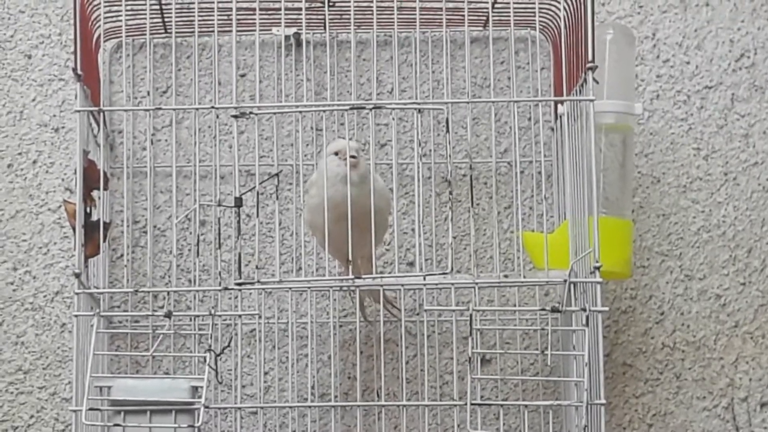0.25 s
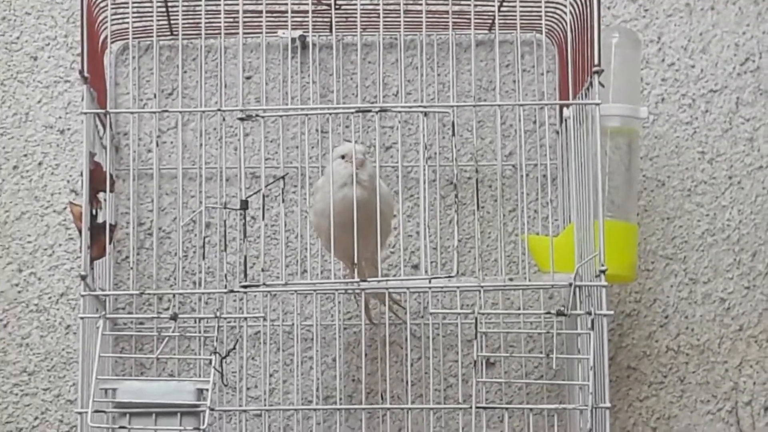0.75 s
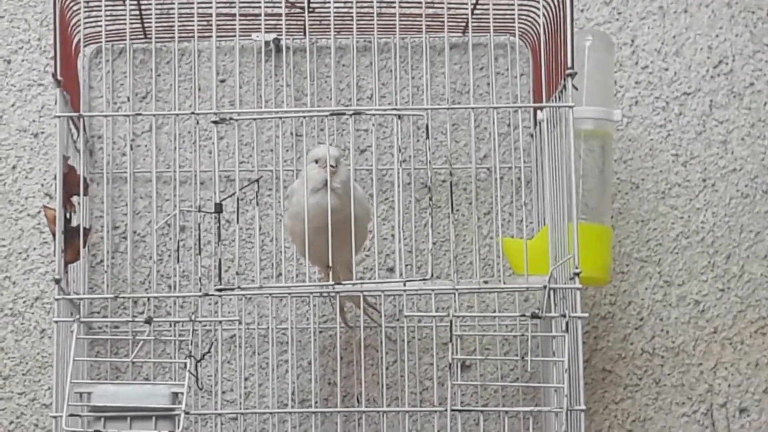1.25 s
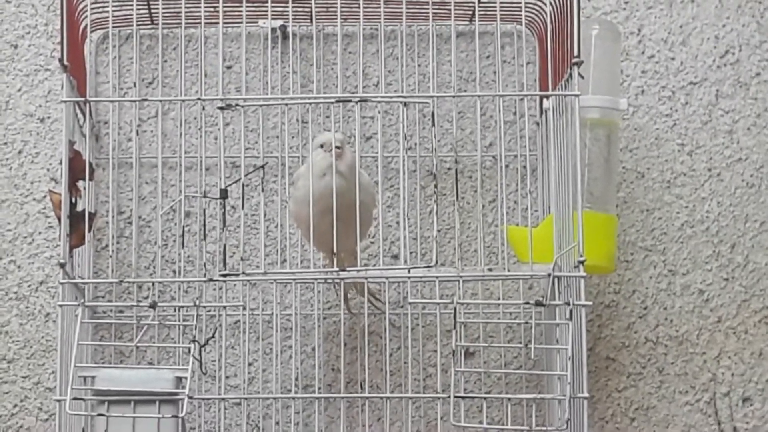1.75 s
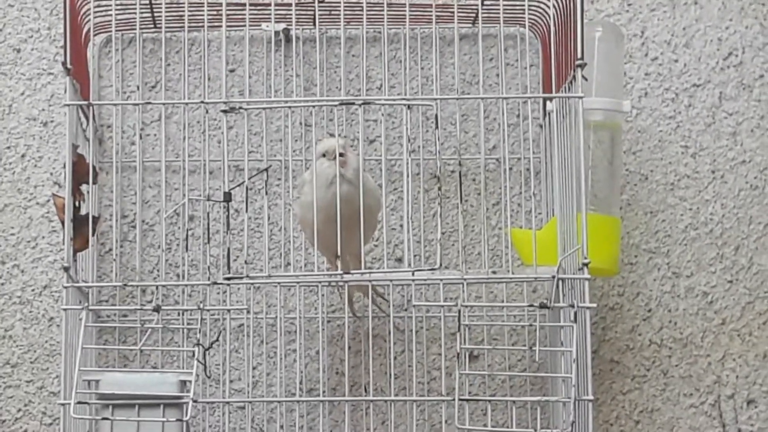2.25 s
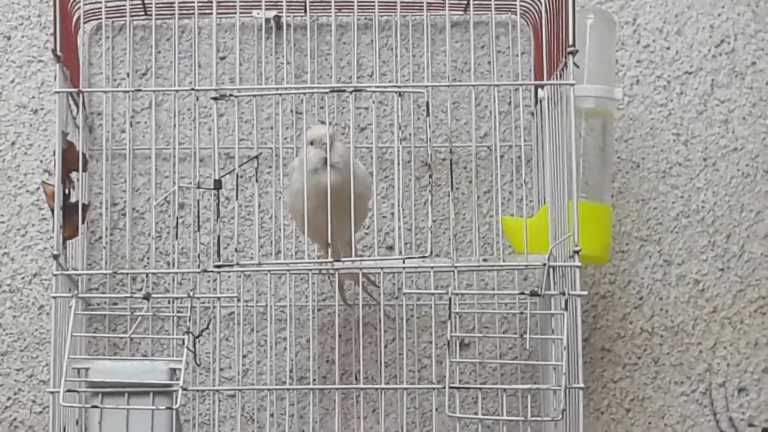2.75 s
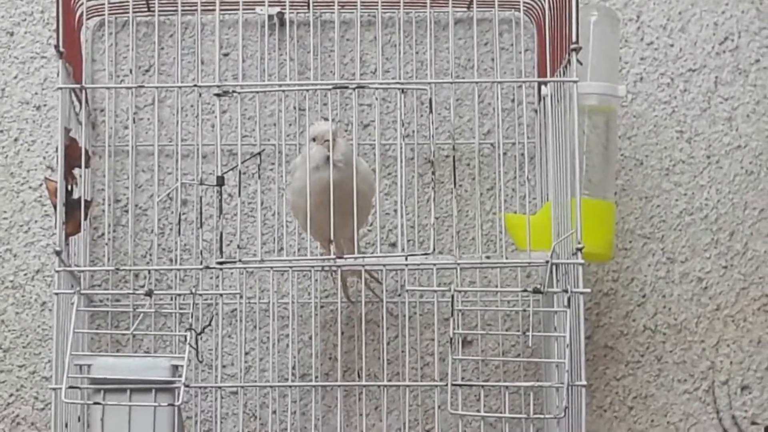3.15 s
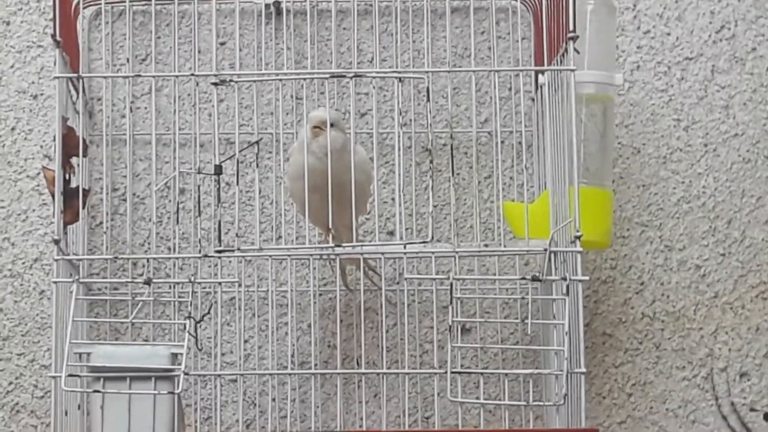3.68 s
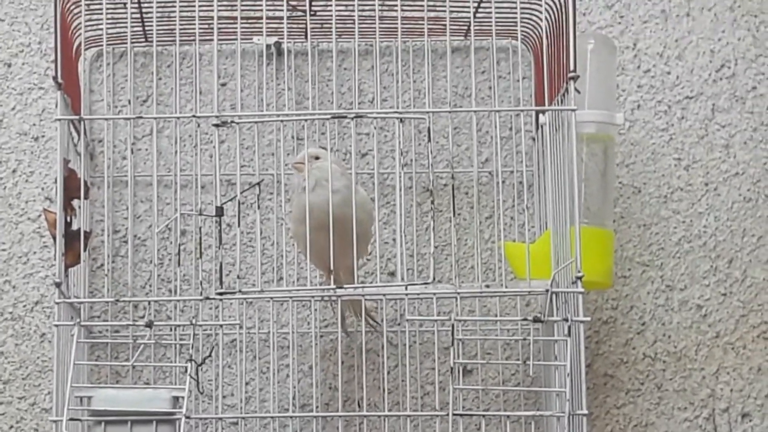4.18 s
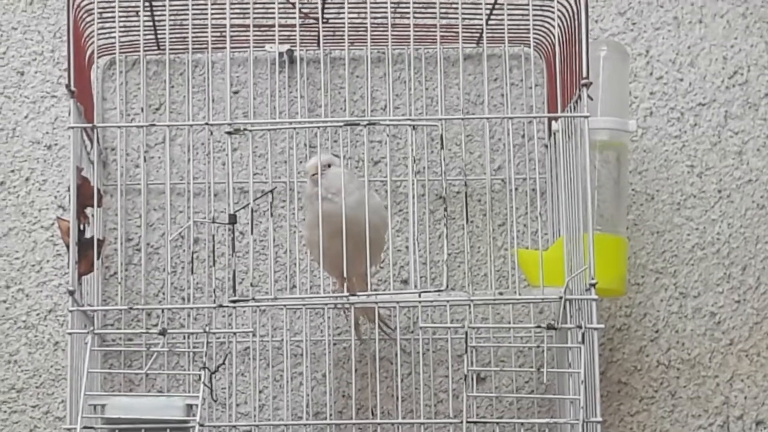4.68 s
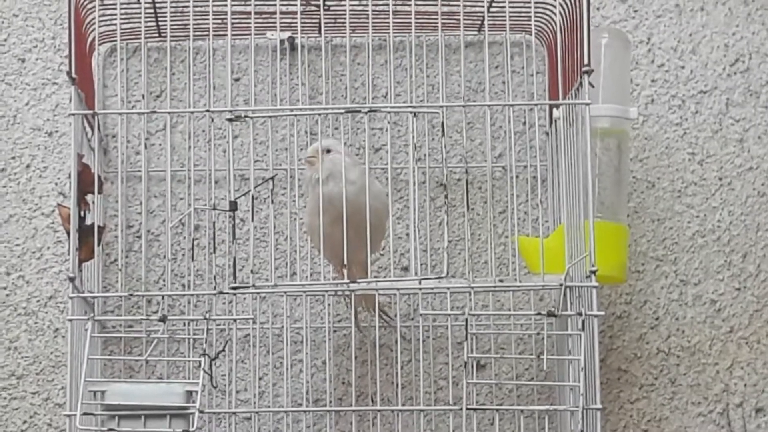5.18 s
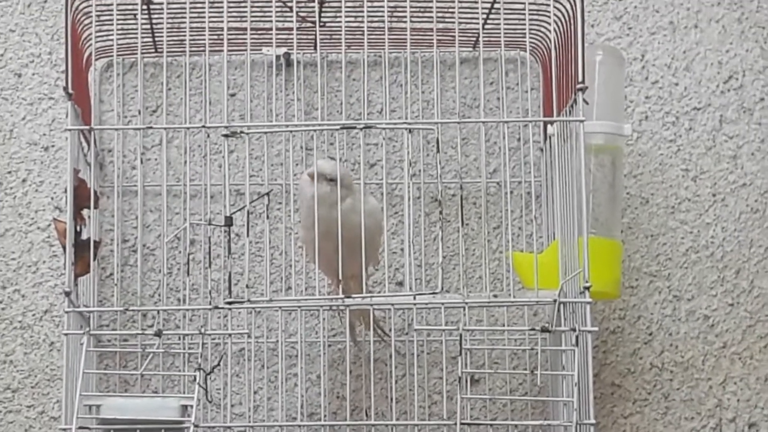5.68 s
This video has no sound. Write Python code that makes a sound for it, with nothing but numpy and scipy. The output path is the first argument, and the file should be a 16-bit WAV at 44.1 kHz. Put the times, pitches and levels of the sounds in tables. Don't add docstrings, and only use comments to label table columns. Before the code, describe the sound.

A single canary sings close to a camera microphone in a hard, echoing space. Rapid sharp chips open, then four steady whistles with tiny high lead-ins, a light falling trill and two rising whistles. More chips lead to a louder swooping trill and wandering whistles. Faint distant birds chatter in bursts over a soft, low outdoor hum.

```python
import sys
import numpy as np
from scipy import signal
from scipy.fft import rfft, irfft
from scipy.io import wavfile
from scipy.ndimage import uniform_filter1d, map_coordinates

SR = 44100
rng = np.random.default_rng(int(sys.argv[2]) if len(sys.argv) > 2 else 0)


def wrap_up_sound(samples):
    columns = np.atleast_2d(samples).T
    tamed = np.clip(columns, -1, 1)
    steps = np.round(tamed * 32767).astype(np.int16)
    wavfile.write(sys.argv[1], SR, steps)


def gain_from_db(level_db):
    decades = np.asarray(level_db, float) / 20
    return 10 ** decades


N = 261513
AHEAD = SR // 10

# frequency in Hz, density in dB per Hz.
HUM_SPECTRUM = [(15, -29.5), (25, -15.5), (48, -6.5), (126, 1.5), (222, 1), (425, -2.5), (1090, -2),
                (1680, -5), (3050, -6), (4820, -15.5), (5820, -21), (7220, -25.5), (9980, -49),
                (13800, -26), (15800, -55)]
# frequency in Hz, level in dB.
MAINS_LINES = [(48.4, -78)]

# peak time in seconds, peak level in dB.
EARLIER_CHIPS = [(-.058, -12), (-.02, -16)]
# peak time in seconds, peak level in dB.
CHIPS_SUNG = [(0.0179, -17.5), (0.0582, -28.5), (0.1014, -16), (0.1404, -16.5), (0.1759, -14.5),
              (0.2153, -15), (0.2468, -32), (2.8546, -23), (2.8901, -22.5), (2.9288, -25), (2.9643, -23.5),
              (2.9973, -19.5), (3.0439, -18.5), (3.0823, -19.5), (3.1195, -18), (3.16, -17),
              (3.1962, -18.5), (3.2244, -33.5)]
# seconds from its peak, pitch as a ratio, level in dB.
CHIP_SHAPE = [(-.0036, 1.34, -18), (-.0019, 1.12, -7), (0, .98, 0), (.0009, .89, -5), (.0018, .76, -11),
              (.003, .63, -17)]

# delay in seconds, level in dB.
WALL_ECHOES = [(.0048, -6), (.0069, -15), (.009, -15.5), (.0145, -25.5)]
# frequency in Hz, time to fall 60 dB in seconds.
ROOM_DECAY = [(2000, 0.42), (4000, 0.3), (8000, 0.37), (15000, 0.15)]
# multiple of the pitch, level in dB.
VOICE_OVERTONES = [(2, -35.5), (3, -36.5), (4, -41), (5, -53)]
# frequency in Hz, gain in dB.
BEAK_COLOUR = [(5000, -9.5), (6400, -7), (7300, 8), (8600, -4), (9800, -10.5), (11500, -8), (13000, 1.5),
               (15000, 16), (16000, -5.5)]

# start in seconds, length in seconds, first pitch in Hz, last pitch in Hz, level in dB.
SECOND_VOICE = [(.056, .01, 5270, 3700, -35), (2.62, 0.087, 2500, 2390, -54.5),
                (2.68, .06, 4330, 4290, -39.5), (4.29, 0.17, 6980, 7050, -47),
                (4.27, .235, 2900, 3180, -35.5), (4.55, 0.65, 2600, 2760, -57),
                (4.6, 0.024, 4300, 4150, -26.5), (2.498, .005, 6400, 4500, -38.5),
                (4.3, .06, 7900, 8700, -55.5)]
LINK_SLURS = [
    (2.645, 0.076, 5015, 5014, -25.5),
    (4.29, .09, 3900, 4126, -22.5),
]
HOARSE_SCRAPS = [(2.82, 0.027, 2690, 2580, -43.5), (4.22, 0.055, 5210, 6780, -40.5),
                 (4.225, .06, 2596, 3576, -36), (4.24, .045, 5580, 6300, -39.5),
                 (4.29, .08, 4980, 5180, -43.5), (4.675, 0.027, 6830, 6740, -42)]
HIGH_NOTES = [
    (5.11, .012, 5220, 6030, -29.5),
    (5.119, .04, 6030, 6253, -26),
    (5.155, 0.021, 6650, 6710, -30),
]
# share of length, share of pitch move, level in dB.
SLUR_SHAPE = [(0, 0.014, -10.5), (.15, .15, -3.5), (.8, .8, 0.5), (1, 1, -9.5)]

# start in seconds, pitch in Hz, level in dB.
LEAD_INS = [(0.304, 6890, -26), (.548, 6860, -18.5), (.822, 6900, -21), (1.105, 6930, -18.5)]
# share of length, pitch as a ratio, level in dB.
LEAD_SHAPE = [(0, 1, -8), (.15, 1, -1), (.55, .985, -2), (.78, .88, -7), (.92, .72, -5), (1, .58, -4)]

# start in seconds, length in seconds, level in dB.
HELD_WHISTLES = [(0.349, .178, -18.5), (0.591, .2, -16), (0.869, .165, -14.5), (1.151, .19, -14)]
HELD_PITCHES = [3400, 3402, 3390, 3366]
# share of length, level in dB.
HELD_SWELL = [(0, -10.5), (.1, -4.5), (.5, 0), (.8, -5.5), (1, -10)]

# start in seconds, hold in seconds, high part in dB, low part in dB.
FLOCK_BURSTS = [(0.443, 0.056, -53.5, -52), (0.582, 0.076, -53.5, -49), (0.727, .06, -52, -50.5),
                (0.839, .07, -53, -47.5), (0.928, 0.1, -52, -50), (1.107, 0.15, -52, -52),
                (1.336, 0.056, -51.5, -53), (1.44, 0.11, -49.5, -52), (1.613, 0.085, -47, -48.5),
                (1.791, 0.09, -47.5, -51), (1.969, 0.088, -49.5, -52), (2.122, 0.12, -53, -50.5),
                (2.245, 0.072, -54, -54.5), (4.207, .05, -69, -56), (4.258, .08, -58.5, -67),
                (4.38, .05, -62.5, -70.5), (4.541, .17, -66.5, -54.5), (4.761, 0.21, -63.5, -55),
                (5.063, 0.055, -57, -52), (5.213, .05, -59, -51), (5.322, 0.048, -56, -55.5),
                (5.435, 0.064, -55, -52.5), (5.543, 0.064, -55, -51.5), (5.676, 0.068, -54, -51.5),
                (5.793, 0.06, -55, -50.5)]
# frequency in Hz, density in dB per Hz.
FLOCK_HIGH_SPECTRUM = [(2060, -33), (3500, 2), (4230, -6), (4710, -2), (7000, -2), (7410, -5), (9240, -30),
                       (12600, -37), (14500, -25), (15800, -41)]
FLOCK_LOW_SPECTRUM = [(880, -49), (1500, -10.5), (2480, -1), (2870, 2), (3260, -6), (3580, -13),
                      (4200, -3.5), (5460, -41.5), (9240, -120)]

# time in seconds, depth in dB.
LEVEL_DIPS = [(.676, -28), (0.705, -14), (1.003, -15), (1.303, -16.5), (1.979, -7), (2.495, -7),
              (3.752, -8.5), (3.853, -10.5), (3.951, -10), (4.379, -11.5), (4.532, -14), (4.562, 0),
              (4.79, -9.5), (4.839, -13), (4.959, -20), (4.994, -4)]

# flick time in seconds, glide length in seconds, bend pitch in Hz, glide level in dB, flick level in dB.
SLIDE_TRILL = [(1.4653, 0.029, 5850, -33, -18), (1.545, 0.025, 5800, -35, -19),
               (1.626, .03, 5600, -30, -15), (1.7052, .032, 5690, -31, -15.5),
               (1.788, 0.027, 5650, -33, -14.5), (1.868, 0.04, 5700, -31.5, -16)]
SWOOP_TRILL = [(3.3408, .036, 3980, -18.5, -13.5), (3.4473, .038, 3870, -17.5, -12.5),
               (3.555, .043, 3890, -17.5, -15), (3.6566, .038, 4040, -19.5, -12),
               (3.7627, .04, 3800, -19, -12.5), (3.8625, .041, 3920, -19, -10.5),
               (3.962, .04, 3980, -18, -11), (4.058, 0.031, 4034, -19, -10.5), (4.16, .036, 4030, -18, -11),
               (4.287, .04, 3965, -19, -13.5)]
# share of length, share of fall, level in dB.
GLIDE_SHAPE = [(0, 0.029, -17), (.3, .31, -11), (.6, .7, -1), (.8, .9, -0.5), (1, 1, -5)]
# seconds from its peak, pitch as a ratio, level in dB.
FLICK_SHAPE = [(-.006, 1, -8), (-.0018, .92, -7), (0, .85, 0), (.0012, .78, -7), (.0036, .66, -16)]

# time in seconds, pitch in Hz, level in dB.
WINDING_WHISTLES = [
    [(1.94, 3970, -22.5), (1.951, 4123, -12.5), (1.995, 4635, -22), (2.045, 5040, -25.5), (2.08, 5056, -17),
     (2.125, 4987, -36)],
    [(4.392, 3600, -17), (4.405, 4000, -23), (4.428, 4197, -18.5), (4.456, 4750, -24.5),
     (4.49, 4605, -25.5), (4.538, 4355, -24), (4.625, 4293, -27.5)],
    [(4.725, 4260, -24.5), (4.745, 4396, -32), (4.77, 4354, -16.5), (4.835, 4265, -25), (4.885, 4348, -22),
     (4.96, 4390, -25.5), (5, 4390, -36)],
]
# start in seconds, length in seconds, first pitch in Hz, last pitch in Hz, level in dB.
RISING_WHISTLES = [
    (2.179, .19, 3475, 4870, -13),
    (2.45, .205, 3505, 4894, -14),
]


def along(points, hz):
    f, v = np.transpose(points)
    return np.interp(np.log(hz + 1), np.log(f + 1), v)


def wobble(rate, n):
    knots = rng.standard_normal(int(n * rate / SR) + 4)
    return map_coordinates(knots, [np.arange(n) * rate / SR])


def hiss(spectrum, patchy_db, lo_hz, hi_hz):
    hz, _, z = signal.stft(rng.standard_normal(N + 2048), SR, nperseg=2048)
    field = uniform_filter1d(rng.standard_normal(z.shape), size=24, axis=0)
    field = uniform_filter1d(field, size=2, axis=1)
    z = z * gain_from_db(patchy_db * field / field.std() + along(spectrum, hz)[:, None])
    in_band = (hz > lo_hz) & (hz < hi_hz)
    band = signal.istft(z * in_band[:, None], nperseg=2048)[1]
    return signal.istft(z, nperseg=2048)[1][:N] / band.std()


def whistle(song, rows, scoop, waver, bright_db, count=4):
    s, hz, db = np.transpose(rows)
    t = np.arange(s[0], s[-1], 1 / SR)
    age = t - s[0]
    pitch = np.interp(t, s, hz) * (1 - scoop * np.exp(-age / 0.0064) + waver * wobble(60, len(t)))
    phase = 2 * np.pi * (np.cumsum(pitch) / SR + rng.random())
    tone = np.sin(phase)
    for k, over_db in VOICE_OVERTONES[:count]:
        heard = k * pitch < 17000
        gain = gain_from_db(over_db + bright_db + along(BEAK_COLOUR, k * pitch))
        tone += heard * gain * np.sin(k * phase)
    fade = np.clip(np.minimum(age, t[-1] - t) / .0008, 0, 1)
    start = AHEAD + round(s[0] * SR)
    song[start:start + len(t)] += gain_from_db(np.interp(t, s, db)) * fade * tone


def outdoor_hum():
    hum = gain_from_db(-49) * hiss(HUM_SPECTRUM, patchy_db=-0.14, lo_hz=25, hi_hz=1980)
    for hz, db in MAINS_LINES:
        hum += gain_from_db(db + 2) * np.sin(2 * np.pi * hz * np.arange(N) / SR)
    return hum


def chips(song):
    for s, db in EARLIER_CHIPS + CHIPS_SUNG:
        hz = 3225 + 50 * (db + 18.0)
        rows = np.multiply(CHIP_SHAPE, [1, hz, 1]) + [s, 0, db]
        whistle(song, rows, scoop=0, waver=.02, bright_db=-1.5)


def room(x, wet_db, onset, turn, count):
    hz, t, z = signal.stft(rng.standard_normal((count, SR)), SR, nperseg=256)
    decay = gain_from_db(-60 * t / along(ROOM_DECAY, hz)[:, None])
    tails = signal.istft(z * decay, SR, nperseg=256)[1][:, :SR]
    tails *= 1 - np.exp(-np.arange(SR) / SR / onset)
    tails *= gain_from_db(wet_db) / np.linalg.norm(tails[0])
    for delay, db in WALL_ECHOES:
        spots = np.round(SR * (delay + .0002 * rng.standard_normal(count))).astype(int)
        tails[np.arange(count), spots] += gain_from_db(db + 2.9 * rng.standard_normal(count))
    turns = np.arange(len(x)) / SR / turn
    facing = np.cos(np.pi * (turns - np.arange(count)[:, None]) / count) ** 2
    sent = x * facing / np.linalg.norm(facing, axis=0)
    return x + signal.fftconvolve(sent, tails, axes=1)[:, :len(x)].sum(0)


def slurs(song):
    kinds = ((SECOND_VOICE, .009, 3), (LINK_SLURS, .003, -.6), (HOARSE_SCRAPS, .015, 3), (HIGH_NOTES, .009, 8))
    for notes, waver, bright_db in kinds:
        for s, length, first_hz, last_hz, db in notes:
            rows = np.multiply(SLUR_SHAPE, [length, last_hz - first_hz, 1]) + [s, first_hz, db]
            whistle(song, rows, .01, waver, bright_db)


def lead_ins(song):
    for s, hz, db in LEAD_INS:
        rows = np.multiply(LEAD_SHAPE, [.032, hz, 1]) + [s, 0, db]
        rows[:, 2] += -9.5 * (rows[:, 1] > .9 * hz)
        whistle(song, rows, scoop=0, waver=.003, bright_db=11, count=1)


def held_whistles(song):
    for (s, length, db), hz in zip(HELD_WHISTLES, HELD_PITCHES):
        rows = np.multiply(HELD_SWELL, [length, 1]) + [s, db]
        whistle(song, np.insert(rows, 1, hz, axis=1), scoop=.13, waver=0.0022, bright_db=-3.5)


def flock():
    rise_s, fade_s = 0.015, 0.059
    s, hold, high_db, low_db = np.transpose(FLOCK_BURSTS)[..., None]
    age = np.arange(N) / SR - s
    shape = np.clip(age / rise_s, 0, 1) * np.exp(-np.clip(age - hold, 0, None) / fade_s)
    high = (gain_from_db(high_db) * shape).max(0) * hiss(FLOCK_HIGH_SPECTRUM, patchy_db=2.5, lo_hz=7300, hi_hz=8300)
    low = (gain_from_db(low_db) * shape).max(0) * hiss(FLOCK_LOW_SPECTRUM, patchy_db=1.8, lo_hz=1900, hi_hz=2500)
    return (high + low) * gain_from_db(0.3 * wobble(120, N))


def level_dips():
    t = np.arange(N) / SR
    drops = [(s, .004, db) for s, db in LEVEL_DIPS]
    drops += [(s + length + 0.055, 0.046, -5) for s, length, _ in HELD_WHISTLES]
    return gain_from_db(sum(db * np.exp(-((t - s) / half) ** 2) for s, half, db in drops))


def trills(song):
    for trill, fall_hz, swell, bright_db in ((SLIDE_TRILL, 1400, 1, 8), (SWOOP_TRILL, 1220, 1.08, 0.99)):
        for s, length, bend_hz, glide_db, flick_db in trill:
            start = s + FLICK_SHAPE[0][0] + 0.0012 - length
            glide = np.multiply(GLIDE_SHAPE, [length, -fall_hz, swell]) + [start, bend_hz + fall_hz, glide_db]
            whistle(song, glide, 0, .006, bright_db)
            flick = np.multiply(FLICK_SHAPE, [1, bend_hz, 1]) + [s, 0, flick_db]
            whistle(song, flick, 0, .006, bright_db=-1)


def winding_whistles(song):
    for rows in WINDING_WHISTLES:
        whistle(song, rows, scoop=.04, waver=0.0034, bright_db=-2.6)


def rising_whistles(song):
    climb_s, creep = .03, .08
    push_s, sag_s, sag_db = .02, 0.032, -13.5
    for s, length, first_hz, last_hz, db in RISING_WHISTLES:
        age = np.linspace(0, length, num=60)
        risen = (1 - creep) * (1 - np.exp(-age / climb_s)) + creep * age / length
        level = db - 12 * np.clip(1 - age / push_s, 0, 1)
        level += sag_db * (1 - np.exp(-np.clip(age - push_s, 0, 1) / sag_s))
        level -= 12 * np.clip(1 - (length - age) / .04, 0, 1)
        pitch = first_hz + (last_hz - first_hz) * risen
        whistle(song, np.c_[s + age, pitch, level], scoop=.1, waver=.005, bright_db=-2.5)


def canary():
    song = np.zeros(AHEAD + N)
    for sing in (chips, slurs, lead_ins, held_whistles, trills, winding_whistles, rising_whistles):
        sing(song)
    return song


def scene():
    hum = outdoor_hum()
    in_room = room(canary(), wet_db=-3.5, onset=0.0036, turn=0.3494, count=3)
    bird = in_room[AHEAD:] * level_dips()
    return (bird + flock() + hum)[None]


def top_cut(x):
    return signal.sosfilt(signal.butter(12, 15940, fs=SR, output="sos"), x)


def record(dry):
    hz = np.fft.rfftfreq(N, 1 / SR)
    bass_cut = hz ** 2 / (hz ** 2 + 36 ** 2)
    mix = irfft(rfft(dry) * (hz < 15900) * bass_cut, N)
    return top_cut(mix)


dry = scene()
out = record(dry)
wrap_up_sound(out)
```